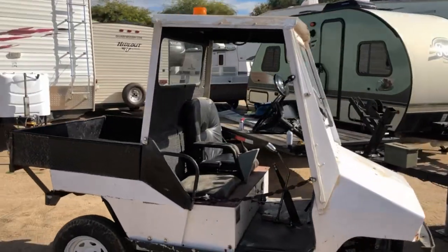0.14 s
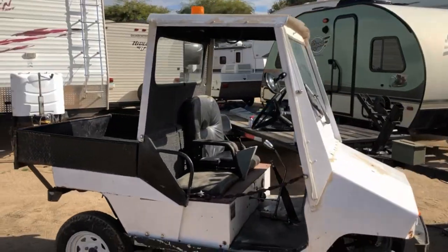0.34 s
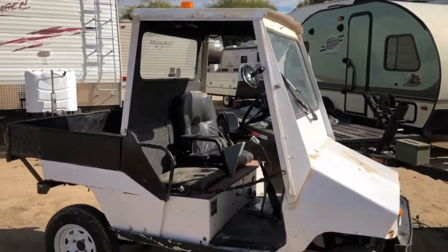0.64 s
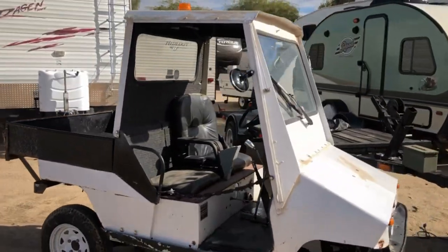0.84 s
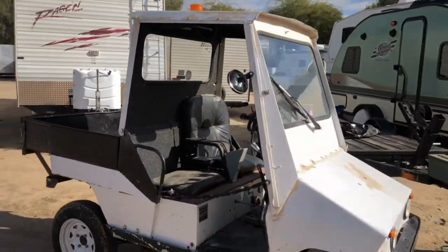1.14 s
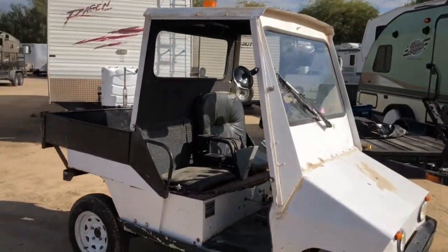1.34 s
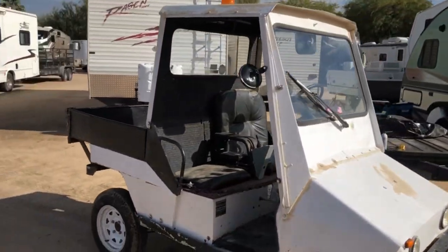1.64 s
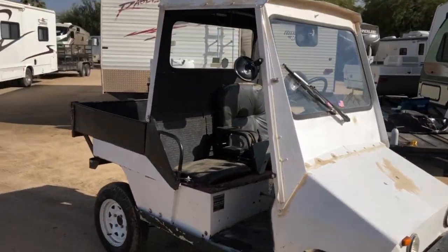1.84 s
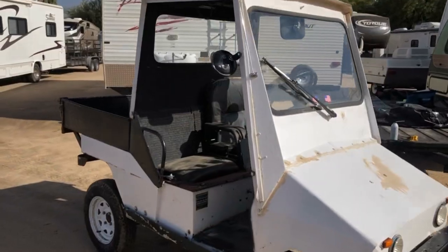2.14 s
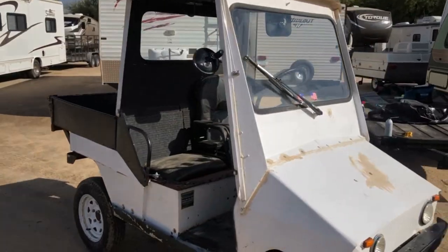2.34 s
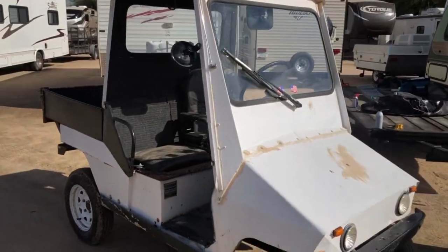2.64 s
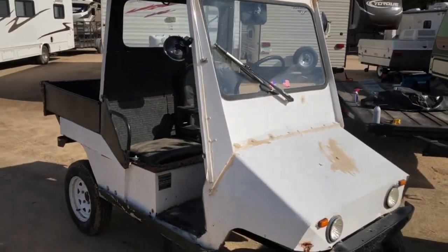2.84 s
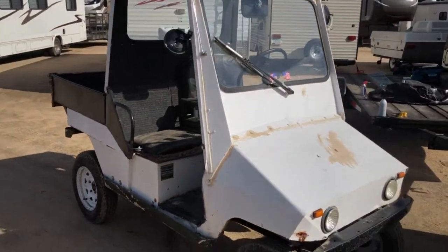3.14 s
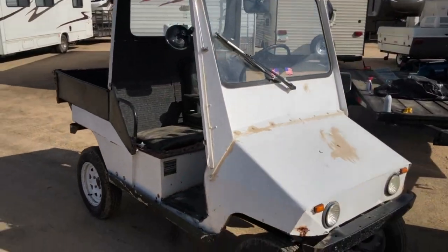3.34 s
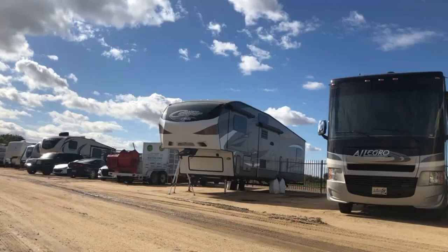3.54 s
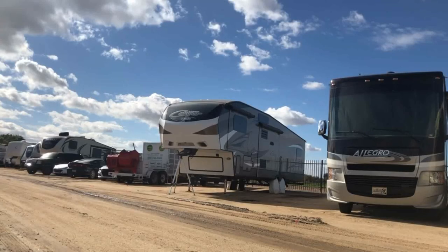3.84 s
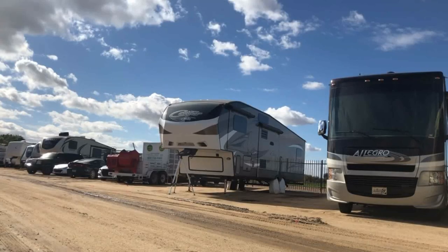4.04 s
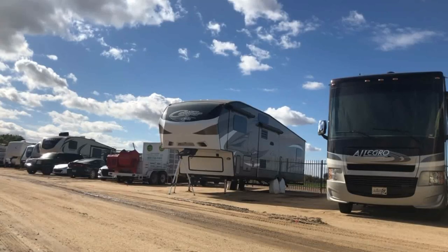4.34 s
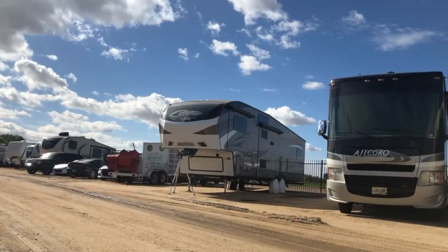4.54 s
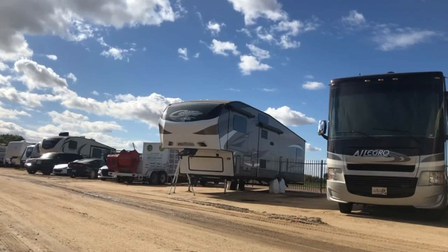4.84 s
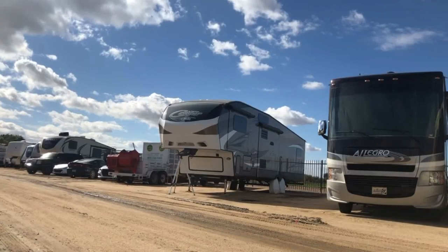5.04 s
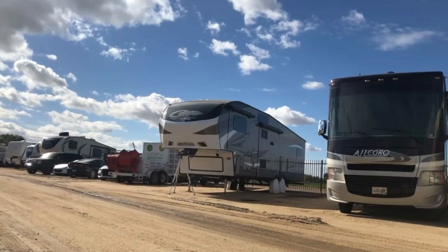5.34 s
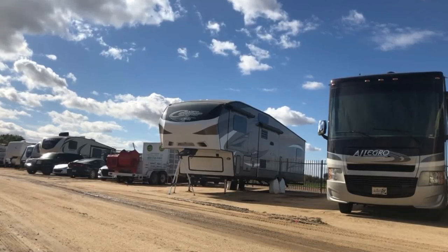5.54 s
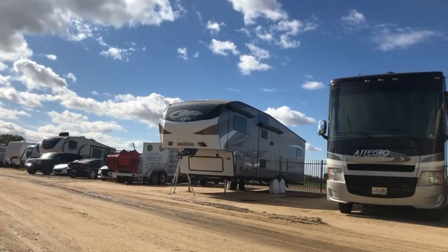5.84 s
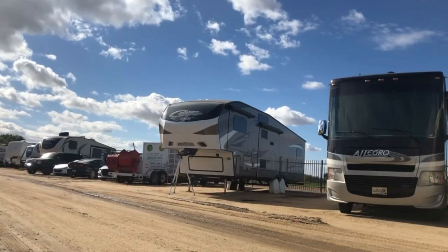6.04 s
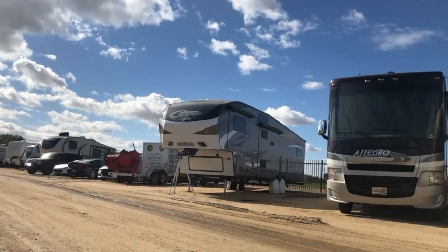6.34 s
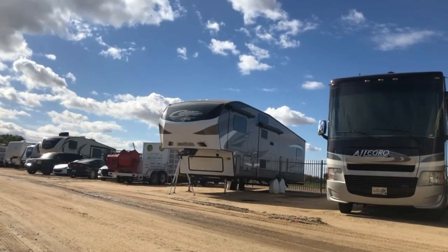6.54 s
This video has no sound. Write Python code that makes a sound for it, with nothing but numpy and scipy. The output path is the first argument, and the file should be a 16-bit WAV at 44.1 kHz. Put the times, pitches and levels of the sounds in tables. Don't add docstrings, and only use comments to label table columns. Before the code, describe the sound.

A small one-cylinder petrol engine clatters at idle in gusty wind, then abruptly the cart is heard farther off, revving and driving closer over dirt.

```python
import sys
import numpy as np
from scipy import signal
from scipy.fft import rfft, irfft
from scipy.io import wavfile
from scipy.ndimage import uniform_filter1d

SR = 44100
rng = np.random.default_rng(int(sys.argv[2]) if len(sys.argv) > 2 else 0)


def linear_from_db(decibels):
    return 10 ** (np.asarray(decibels, float) / 20)


def wav_out(sig):
    wavfile.write(sys.argv[1], SR, np.round(np.clip(np.atleast_2d(sig).T, -1, 1) * 32767).astype(np.int16))


N = 294579
T = np.arange(N) / SR
CUT_S = 3.367


def evened(x):
    return x / np.sqrt(np.mean(x ** 2) + 1e-20)


def evened_drive(x):
    return x / x[T > CUT_S].std()


def noise():
    return rng.standard_normal(N)


def curves(rows):
    s, *columns = np.transpose(rows)
    return [np.interp(T, s, c) for c in columns]


def coloured(points, x=None):
    x = noise() if x is None else x
    hz, db = np.transpose(points)
    log_hz = np.log(np.fft.rfftfreq(N + 1, 1 / SR) + 1)
    gain = linear_from_db(np.interp(log_hz, np.log(hz), db))
    return evened(irfft(rfft(x, N + 1) * gain, N + 1)[:N])


def ring(x, hz, width):
    return signal.lfilter(*signal.iirpeak(hz, hz / width, SR), x)


def ring_twice(x, hz, width):
    return ring(ring(x, hz, width), hz, width)


def body(x, modes):
    return evened(sum((-1) ** k * linear_from_db(db) * ring(x, hz, w) for k, (hz, w, db) in enumerate(modes)))


def strikes(turns, place, spread_db):
    count = np.floor(turns - place)
    size = linear_from_db(spread_db * rng.standard_normal(100))[count.astype(int) % 100]
    return size * (np.diff(count, prepend=count[0]) > 0)


def fading(clicks, decay_s, rise_s):
    t = np.arange(4000) / SR
    return signal.oaconvolve(clicks, np.exp(-t / decay_s) * (1 - np.exp(-t / rise_s)))[:N]


# t/s, engine cycle rate f/Hz
HUNT = [(0, 11.821), (.8, 11.475), (1.5, 11.462), (1.8, 11.745), (2.3, 12.166), (2.9, 11.717),
        (3.37, 11.808)]
# t/s, closeness level/dB
WALK = [(0, 0.5), (.42, 0.5), (.84, -0.5), (1.26, 0.5), (1.68, -0.5), (2.1, .5), (2.52, 0.16),
        (2.94, -0.35), (3.36, -0.1)]
# level/dB at the side, level/dB gained on reaching the front
LAYER_LEVELS = [
    (-33.5, -0.2),
    (-49.5, 6.5),
    (-43, -0.5),
    (-38, -4),
    (-36, -3),
    (-39, -1),
    (-50, -1),
]


def idling():
    turns = 0.6 + np.cumsum(curves(HUNT)[0]) / SR
    close_db, = curves(WALK)
    firing = strikes(turns, 0, 1.5)
    layers = (casing_clack(turns, firing), valve_hiss(turns), sigh(turns, firing), gear_rattle(turns),
              block_hum(), exhaust_thump(turns), bright_tick(turns))
    return sum(linear_from_db(db + gained_db * T / CUT_S + close_db) * x
               for x, (db, gained_db) in zip(layers, LAYER_LEVELS))


# f/Hz, bandwidth/Hz, level/dB
CASING = [(1660, 120, -12.5), (1980, 49, -20), (2007, 130, -16.5), (2309, 33, 2), (2425, 82, 0.5),
          (2551, 64, -0.5), (2680, 23, -5), (3127, 135, -8.5), (3620, 72, -16), (4000, 58, -12.5),
          (4390, 21, -25.5), (5480, 53, -25.5)]


def casing_clack(turns, firing):
    return body(knocks(turns) + .075 * noise() + 5.6 * firing, CASING)


# place in cycle (0-1), level/dB, noisy tail t/s
BLOWS = [
    (0, 2, .001),
    (.028, 5, .0013),
    (.11, -5, .0025),
    (.21, -9, .0025),
    (.5, -16, .006),
    (.715, -7, .002),
    (.88, -11, .003),
    (.96, -9, .002),
]


def knocks(turns):
    t, out = np.arange(1500) / SR, np.zeros(N)
    facing_away = np.clip(1 - T / 2, 0, 1)
    for at, db, tail_s in BLOWS:
        hits = linear_from_db(db - 2.2 * (at > .4) * facing_away) * strikes(turns, at, 1.1)
        jolt = rng.standard_normal(len(t)) * np.exp(-t / tail_s)
        out += signal.oaconvolve(hits, jolt)[:N]
        out += .5 * fading(hits, tail_s, .0003) * noise()
    return out


# place in cycle (0-1), level/dB, decay t/s
PUFFS = [
    (.72, -2, .002),
    (.87, 0, .004),
    (.65, -15, .004),
]
# f/Hz, level/dB per Hz
HISS = [(2940, 2.5), (5000, -5.5), (5460, -3.5), (8740, -1), (12600, -6.5), (15100, -3.5), (16100, -22)]


def valve_hiss(turns):
    puffs = sum(linear_from_db(db) * fading(strikes(turns, at, 0.41), decay_s, 0.0015) for at, db, decay_s in PUFFS)
    return coloured(HISS, (puffs + 0.027) * noise())


# f/Hz, level/dB per Hz
SIGH = [(2500, 5), (4500, 0.5), (7500, 1.5), (10000, -4.5), (16000, -19)]


def sigh(turns, firing):
    early = fading(strikes(turns, 0.905, 0.95) + .6 * strikes(turns, 0.734, .9), 0.026, 0.0031)
    flow = fading(firing, 0.024, 0.0013) + 2.7 * early + 0.1
    return coloured(SIGH, flow * noise())


# f/Hz, bandwidth/Hz, level/dB
PANEL = [(719, 50, -2.5), (888, 37, 1), (1002, 81, -0.5), (1122, 14.3, 8.5), (1209, 45, 5), (1375.5, 39, 2)]


def gear_rattle(turns):
    swell = 0.41 + 0.96 * np.cos(2 * np.pi * (turns - .1))
    teeth = np.exp(-(12 * turns % 1) / 0.29) * swell
    flaws = rng.standard_normal(3800)[(turns % 1 * 3799).astype(int)]
    return body((teeth + 0.59) * (noise() + 1.26 * flaws), PANEL)


# f/Hz, level/dB per Hz
BLOCK = [(18, -39), (30, -2), (91, 2), (193, -8.5), (263, -4.5), (598, -16), (996, -15), (2120, -6.5),
         (2420, -13), (3680, -20.5), (6000, -30), (7800, -68), (13200, -120)]


def block_hum():
    return coloured(BLOCK)


# f/Hz, bandwidth/Hz, level/dB
THUMP = [(68, 21, -2), (120, 24, -0.5), (273, 71, 1.5)]


def exhaust_thump(turns):
    push = fading(strikes(turns, .79, 2), .002, .001)
    return body(push * (1 + 1.5 * ring(noise(), 200, 300)), THUMP)


def bright_tick(turns):
    tick = fading(strikes(turns, 0.022, 2.6), 0.0033, 0.0011) * noise()
    return evened(ring_twice(tick, 3000, 2500))


BARK_DB, BARK_LOAD = -59.5, 0.88
# t/s, firing rate f/Hz
SPEED = [(3.37, 17.596), (3.68, 16.867), (3.9, 17.11), (4.18, 17.951), (4.42, 17.837), (5.02, 20.665),
         (5.21, 22.943), (5.42, 24.033), (5.79, 24.978), (6.0, 23.889), (6.4, 22.991), (6.68, 22.779)]
# t/s, engine load level/dB, closeness level/dB, pitch cancelled by the ground echo f/Hz
DRIVE = [(3.37, 2, 1.1, 141.5), (3.62, -0.5, 2.5, 134), (3.88, 2.5, 3.5, 122), (4.13, 4.3, 4, 111),
         (4.39, 4.5, 5, 109), (4.64, 8.5, 4.5, 127), (4.9, 9.5, 4.5, 195.4), (5.15, 13.5, 7, 163),
         (5.41, 15.7, 7.5, 252), (5.66, 15.5, 8, 207), (5.8, 17.5, 8.5, 212), (5.92, 14.5, 8, 192),
         (6.17, 15.5, 9, 142), (6.43, 14, 10.5, 117), (6.68, 15, 12, 101)]
# start t/s, end t/s
WIDE_OPEN_S = (5.02, 5.88)


def driving():
    speed_hz, = curves(SPEED)
    turns = np.cumsum(speed_hz * (T > CUT_S)) / SR
    load_db, close_db, dip_hz = curves(DRIVE)
    wide_open = uniform_filter1d(1. * (T > WIDE_OPEN_S[0]) * (T < WIDE_OPEN_S[1]), size=3000)
    roar_db = -51.5 + close_db
    hiss_db = -64.5 + 1.12 * close_db + 0.17 * load_db + 3.5 * wide_open
    valves = valve_opening(turns)
    out = exhaust(turns, speed_hz, load_db, dip_hz)
    out += linear_from_db(BARK_DB + BARK_LOAD * load_db - 2) * exhaust_gas(turns)
    out += linear_from_db(roar_db) * roar(turns)
    out += linear_from_db(hiss_db) * driving_hiss(valves)
    out += linear_from_db(roar_db - 15) * loose_part(valves) * wide_open
    out += linear_from_db(-58) * np.clip((T - 5.95) / 0.26, 0, 1) * tappet(turns)
    out += linear_from_db(roar_db + 3) * tyre_rumble()
    return out + linear_from_db(-79 + 2.7 * close_db) * tyre_grit()


# level/dB at light load, level/dB gained per dB of load
ORDERS = [
    (-68, 1.59),
    (-63, 1.34),
    (-57, 0.85),
    (-44.5, 0.89),
    (-48, 1.38),
    (-35.5, -0.03),
    (-39, 0.1657),
    (-35, -0.25),
    (-47, 0.1),
]


def exhaust(turns, speed_hz, load_db, dip_hz):
    late, out = T >= CUT_S, np.zeros(N)
    order = np.arange(2, 25)[:, None]
    rough = np.clip((order - 9) / 3, .08, 1)
    bark = [(BARK_DB + 4 - 1.7 * k, BARK_LOAD) for k in range(14)]
    levels = np.array([db + share * load_db[late] for db, share in [*ORDERS, *bark]])
    levels += -7 * np.exp(-(np.log(order * speed_hz[late] / dip_hz[late]) / 0.17) ** 2)
    height = np.sqrt(2) * linear_from_db(levels + 3 * rough * wander(size=23, smooth=6))
    place = np.where(order < 8, .1, np.interp(T[late], [3.8, 5.1], [.22, -.08]))
    jump = .3 * (order == 4) + .3 * (order == 8) + (order > 10) * rng.random(order.shape)
    lag = np.cumsum(np.where(order == 8, .1, place) - jump, axis=0)
    lag = lag + .08 * rough * wander(size=23, smooth=6)
    out[late] = (height * np.cos(2 * np.pi * (order * turns[late] - lag) + 3.42)).sum(0)
    return out


def wander(size, smooth):
    steps = rng.standard_normal((size, 400))
    steps = uniform_filter1d(uniform_filter1d(steps, smooth), smooth)
    return np.array([np.interp(T[T >= CUT_S] * 50, np.arange(400), evened(row)) for row in steps])


def exhaust_gas(turns):
    gas = fading(strikes(turns, .95, 2), .012, .003) * noise()
    return evened_drive(ring_twice(gas, 340, 500))


# f/Hz, level/dB per Hz
ROAR_FAR = [(180, -6.5), (300, 0.5), (748, -13), (819, -9), (985, -1.5), (1130, -5), (1420, -14),
            (1660, -14.5), (2280, -17.5), (2500, -4.5), (3040, -25), (3550, -12), (3830, -13.5),
            (6500, -33), (8450, -63), (14300, -120)]
# f/Hz, level/dB per Hz
ROAR_NEAR = [(290, -19), (500, 0), (581, -18.5), (647, -4.5), (728, -17), (855, -9.5), (1060, -16),
             (1330, -14.5), (1790, -25.5), (2060, -20), (3530, -27.5), (4010, -21), (5590, -41),
             (6500, -41), (8450, -45), (14300, -120)]


def roar(turns):
    near = np.clip((T - 3.9) / 1.46, 0, 1)
    throb = 1.1 + fading(strikes(turns, .85, 2.5), .01, .003)
    return evened_drive(throb * (np.sqrt(1 - near) * coloured(ROAR_FAR) + np.sqrt(near) * coloured(ROAR_NEAR)))


def valve_opening(turns):
    first = fading(strikes(turns, 0.484, 1.7), 0.0043, 0.00049)
    second = fading(strikes(turns, 0.71, 1.4), 0.0072, 0.0016)
    return 0.37 + first + 0.45 * second


# f/Hz, level/dB per Hz
FAR_HISS = [(2940, -8), (5000, -4.5), (5680, -13.5), (7510, -7), (8490, -8), (10300, -16), (11200, -14),
            (15100, -22), (16100, -16)]


def driving_hiss(valves):
    return evened_drive(coloured(FAR_HISS, valves * noise()))


def loose_part(valves):
    shaken = ring(valves ** 2 * noise(), 4250, 350)
    return evened_drive(ring(shaken, 4240, 350))


def tappet(turns):
    tick = fading(strikes(turns, 0.49, 2.5), .004, .001) * noise()
    return evened_drive(ring_twice(tick, 8400, 1500))


def tyre_rumble():
    return evened(ring(noise(), 98, 89))


def tyre_grit():
    return evened_drive(ring(noise(), 2900, 2200))


# middle t/s, length t/s,
# low buffet level/dB, sharper flutter level/dB
GUSTS = [(.09, 0.042, -24, -27.5), (0.181, 0.029, -26, -41), (0.246, .06, -27.5, -38.5),
         (0.404, 0.13, -27.5, -25), (0.512, 0.066, -23, -22), (0.584, 0.053, -25.5, -32.5),
         (0.661, 0.047, -34, -34), (0.717, .06, -30, -35), (.79, 0.036, -28.5, -39),
         (0.867, 0.036, -35.5, -36.5), (1.143, 0.027, -28.5, -41), (1.238, 0.034, -27.5, -39.5),
         (1.33, .09, -33.5, -45), (1.51, 0.067, -27, -33.5), (1.582, 0.063, -31, -35),
         (1.663, 0.071, -26, -30), (1.735, 0.046, -27, -37), (1.845, 0.04, -45, -54),
         (1.915, 0.017, -33, -38), (2.11, 0.095, -32.5, -39.5), (2.193, 0.07, -29.5, -32),
         (2.34, 0.1, -38, -48), (2.43, 0.043, -35, -41), (2.674, 0.045, -42, -39.5),
         (2.755, 0.042, -25.5, -39.5), (2.83, 0.13, -40, -51), (3.127, 0.075, -38, -56),
         (3.344, 0.038, -49, -37.5)]
# buffet level/dB, flutter level/dB
BREEZE_DB = [-49.5, -52]
# t/s, peak level/dB, f/Hz
POPS = [(0.4, -5, 600), (0.481, -5.5, 485), (0.492, -0.5, 580), (0.5, -10, 453), (0.514, -8, 595),
        (0.66, -12.5, 434), (1.472, -17, 286), (1.665, -11, 251), (1.722, -12.5, 284), (2.119, -18, 252),
        (2.726, -12, 454), (2.735, -17, 300), (2.758, -8.5, 260)]


def wind():
    strength = linear_from_db(np.array(BREEZE_DB))[:, None] + 0 * T
    for s, length_s, *db in GUSTS:
        gust = np.exp(-(2 * (T - s) / length_s) ** 4)
        strength = strength + linear_from_db(np.array(db))[:, None] * gust
    buffet, flutter = eddies(92.8, 223, 45), eddies(247.0, 796, 60)
    out = strength[0] * buffet + strength[1] * flutter
    for s, db, hz in POPS:
        wiggle = linear_from_db(db - 4.0) * eddy(hz, 1.68)
        out[round(s * SR):][:len(wiggle)] += wiggle
    return out


def eddies(low_hz, high_hz, per_s):
    out = np.zeros(N)
    for hz in np.geomspace(low_hz, high_hz, num=8):
        train = (rng.random(N) < per_s / SR) * noise()
        out += signal.oaconvolve(train, eddy(hz, 2.33))[:N]
    slow = uniform_filter1d(uniform_filter1d(evened(out) ** 2, size=2000), size=2000)
    return evened(out / np.sqrt(slow + 0.18))


def eddy(hz, cycles):
    u = np.arange(round(cycles * SR / hz)) * hz / SR
    return -np.sin(2 * np.pi * u) * np.sin(np.pi * u / cycles) ** 2


def scene():
    return np.where(T < CUT_S, idling() + wind(), driving())[None]


def low_pass(x):
    return signal.sosfilt(signal.butter(12, 15990, fs=SR, output="sos"), x)


def record(dry):
    thin = signal.sosfilt(signal.butter(4, 46, "highpass", fs=SR, output="sos"), dry)
    overload = .5
    return low_pass(overload * np.tanh(thin / overload))


dry = scene()
out = record(dry)
wav_out(out)
```